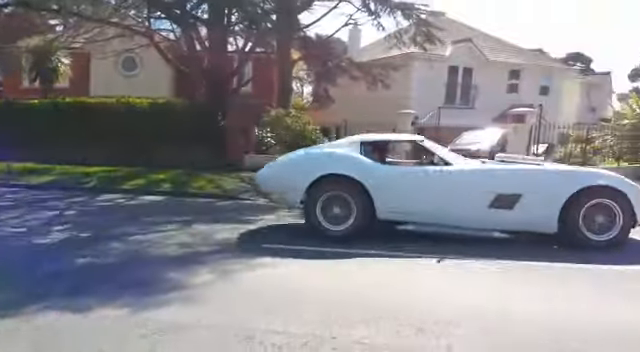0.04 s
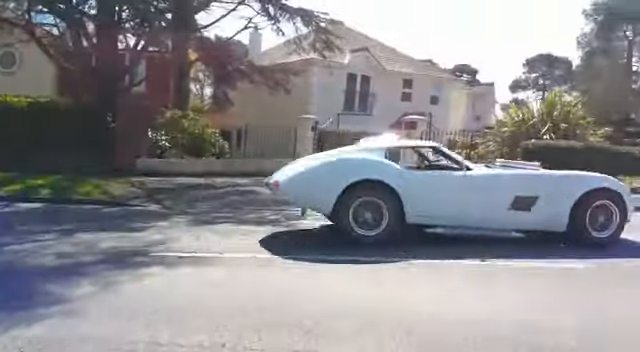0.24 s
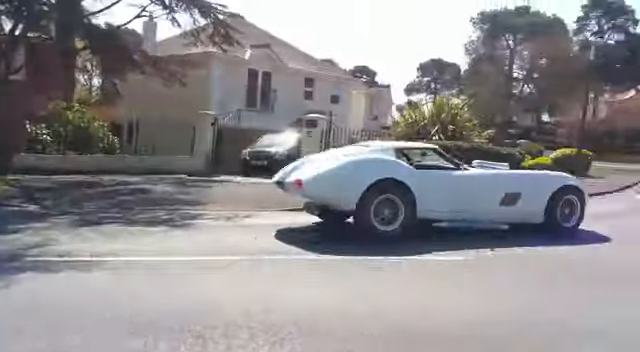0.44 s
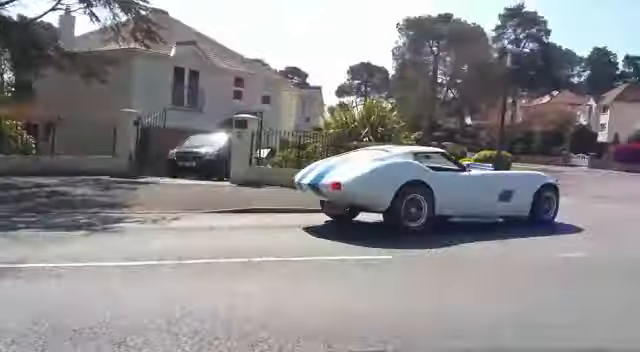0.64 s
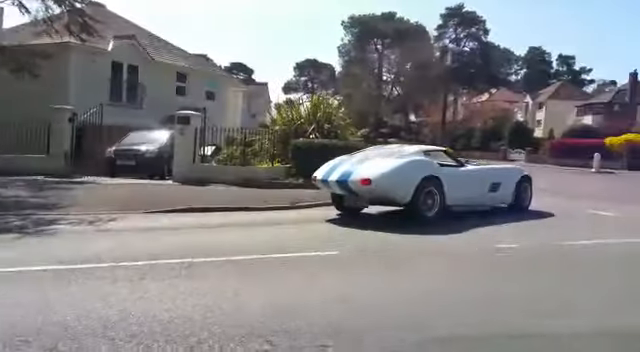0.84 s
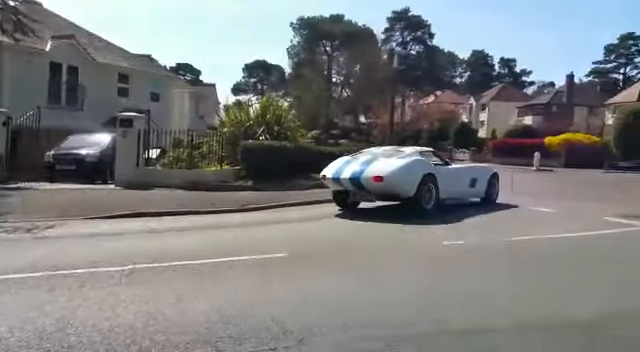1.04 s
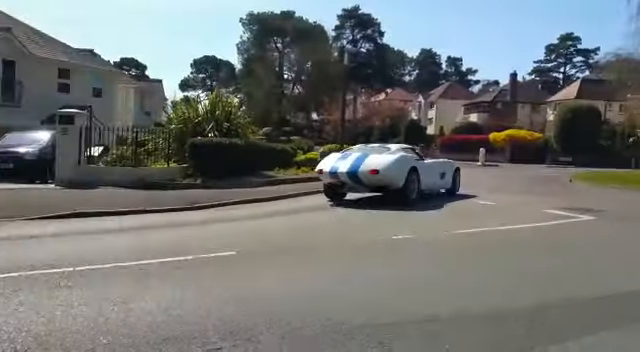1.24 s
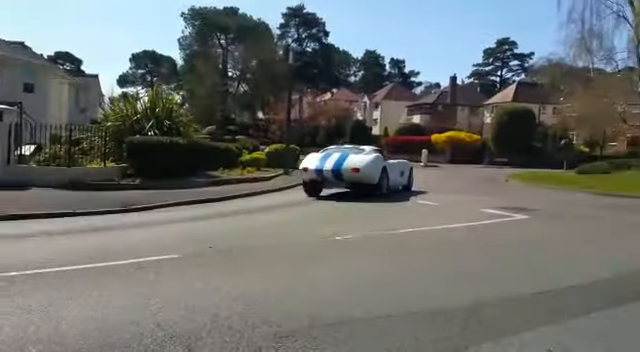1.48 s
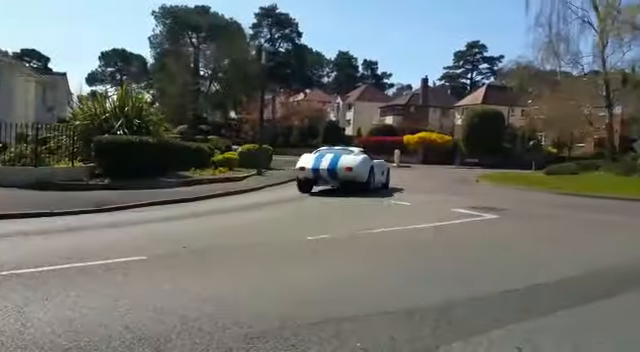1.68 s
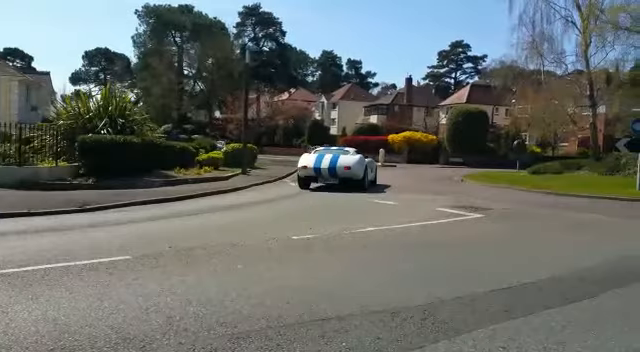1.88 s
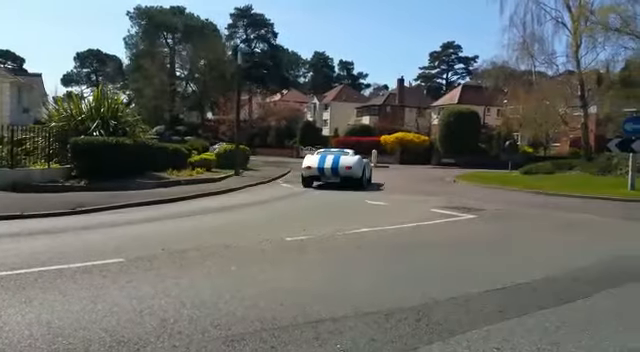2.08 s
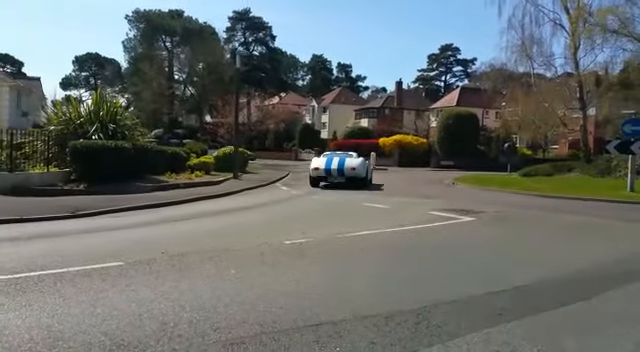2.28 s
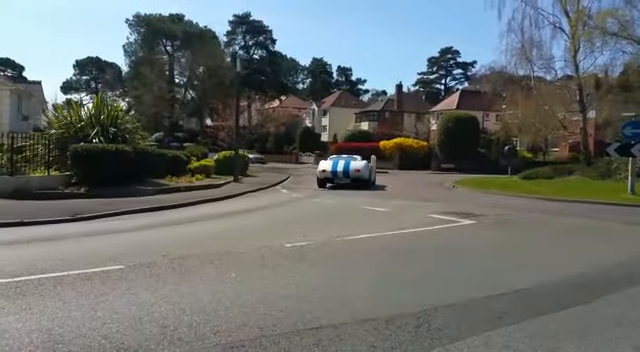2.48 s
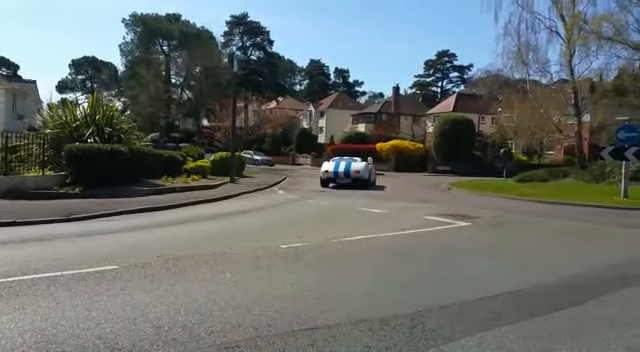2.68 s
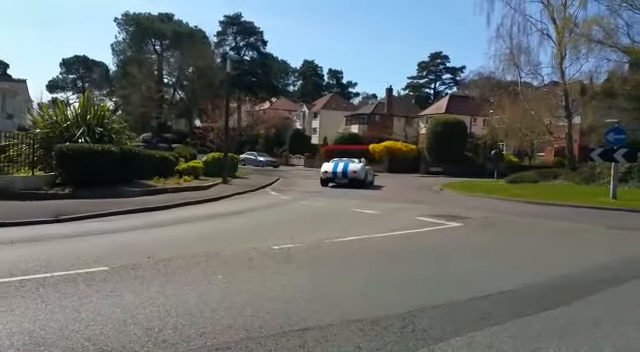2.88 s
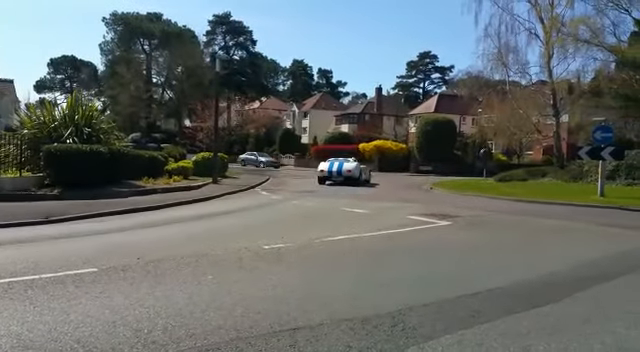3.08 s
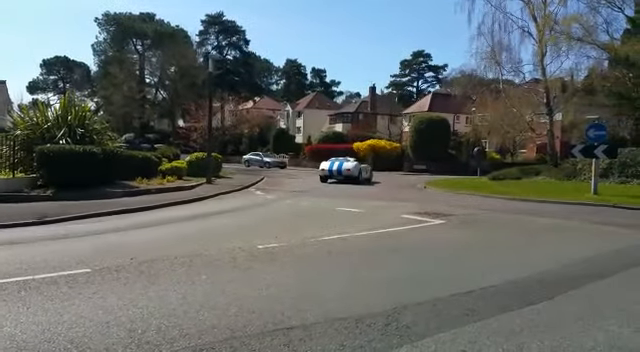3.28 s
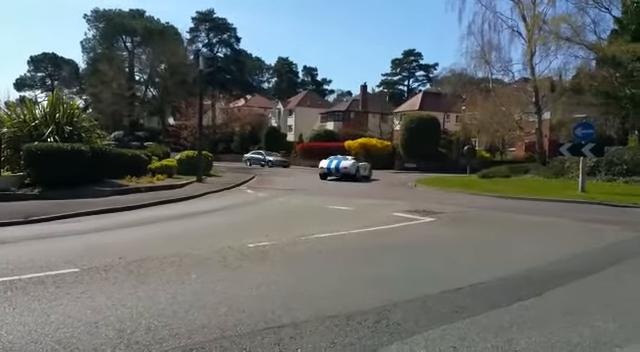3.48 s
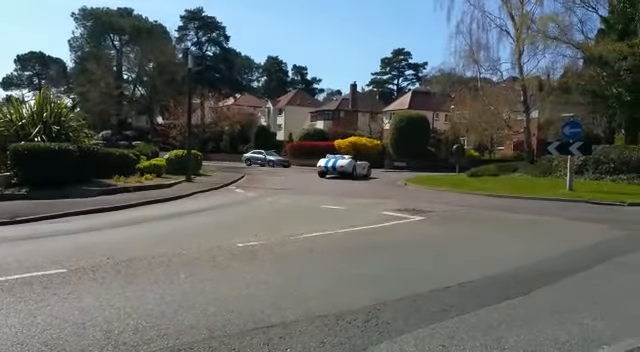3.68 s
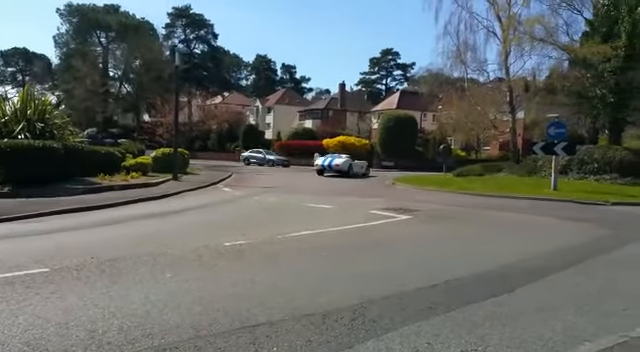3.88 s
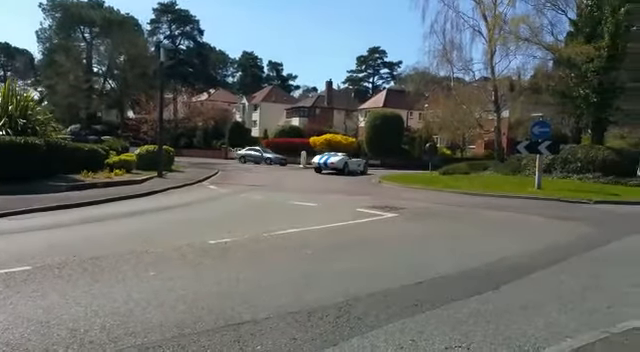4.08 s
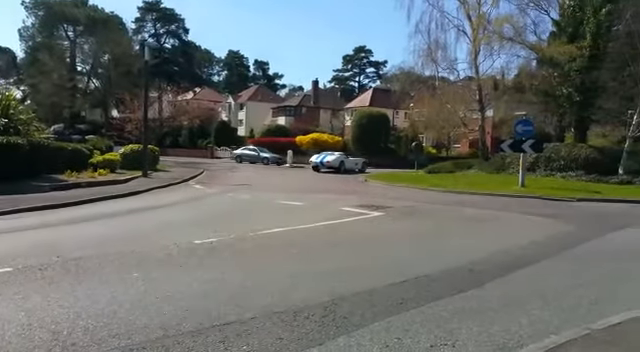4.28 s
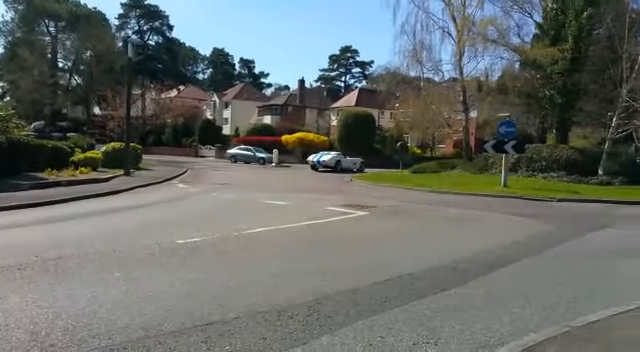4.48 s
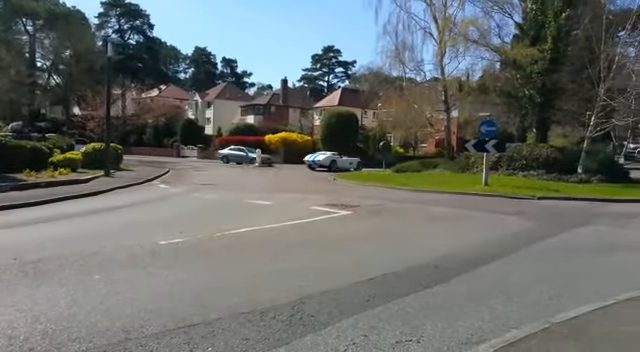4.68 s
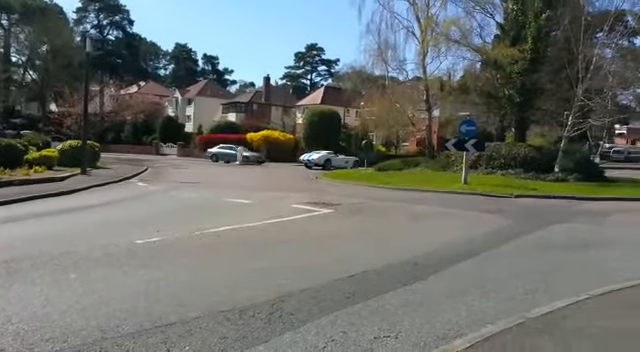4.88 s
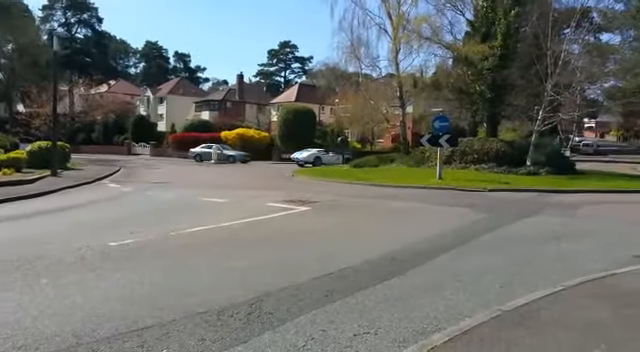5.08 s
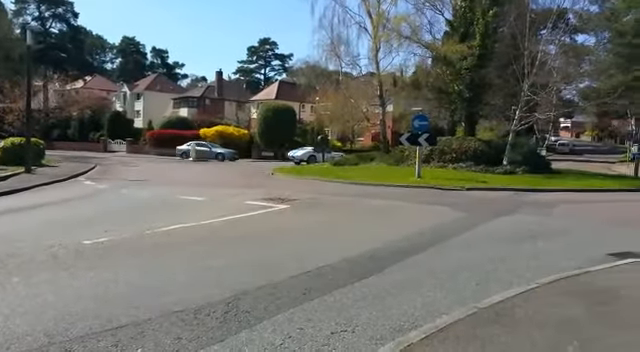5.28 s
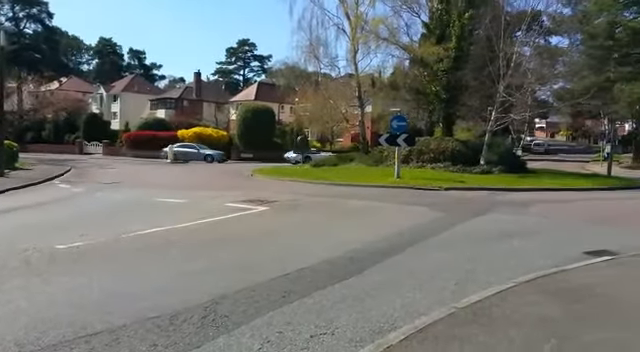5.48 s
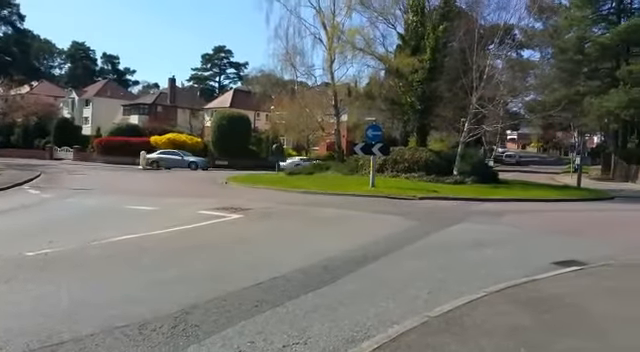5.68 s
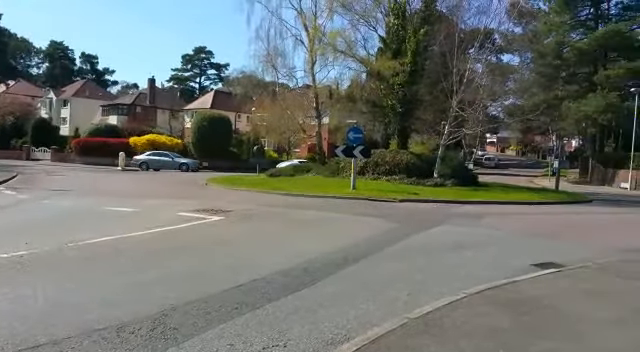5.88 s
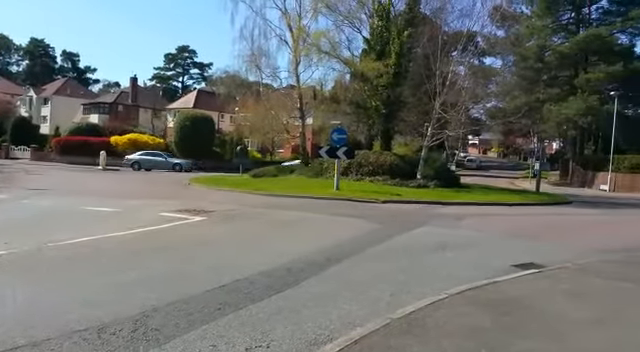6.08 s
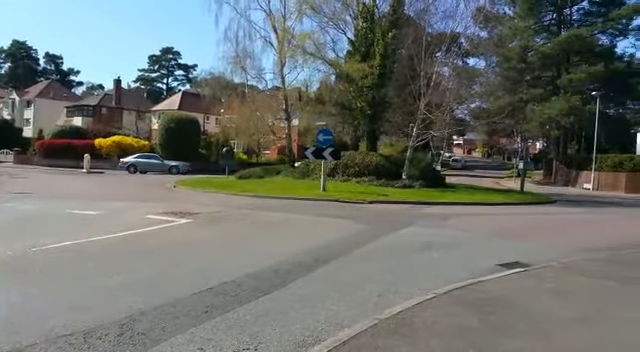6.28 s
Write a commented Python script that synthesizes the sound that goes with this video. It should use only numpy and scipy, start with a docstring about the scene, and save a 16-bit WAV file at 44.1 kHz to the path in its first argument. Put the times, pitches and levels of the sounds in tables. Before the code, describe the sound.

A coupe burbles past at low revs with a deep, uneven throb, pulls away, lifts off, then rumbles faintly as another car rolls in.

```python
"""V8 coupe passing on a quiet street

The coupe burbles past at low revs, pulls away, lifts off and rounds a traffic island. Its uneven firings ring
the exhaust pipes, gas rushes out in puffs, and scattered echoes answer; its tyres are shaped noise that fades
to a faint background hiss. Another car rolls up from the left as shaped noise and a hum. Chirps, ticks made of
dying bursts and a thin whine sit close to the two-port microphone."""
import sys
import numpy as np
from scipy import signal
from scipy.fft import rfft, irfft
from scipy.io import wavfile
from scipy.ndimage import uniform_filter1d

SR = 44100
rng = np.random.default_rng(int(sys.argv[2]) if len(sys.argv) > 2 else 0)


def bounce(signal):
    """Save signal as a 16-bit WAV file at the path given by the first command-line argument."""
    frames = np.transpose(np.atleast_2d(signal))
    limited = np.clip(frames, -1, 1)
    pcm = np.round(limited * 32767).astype(np.int16)
    wavfile.write(sys.argv[1], SR, pcm)


N = 279594
TIME = np.arange(N) / SR
BINS = np.fft.rfftfreq(N, 1 / SR)

# engine speed, eight firings to an engine cycle: time_s, firing_rate_hz
ENGINE_SPEED = [(0, 50.15), (.5, 47.48), (.87, 56.04), (1.31, 73.8), (1.69, 74.5), (2.15, 78.34),
                (2.6, 77.47), (2.99, 63.03), (3.54, 62.29), (3.82, 67.37), (3.94, 65.93), (4.43, 71.64),
                (4.79, 78.74), (5.19, 77.91), (5.64, 81.65), (5.76, 85.22), (6.34, 83.65)]


def amp(db):
    """Level law: decibels to amplitude ratio."""
    return 10 ** (np.asarray(db) / 20)


def evened(x):
    """Normalisation to unit rms."""
    return x / np.sqrt(np.mean(x ** 2) + 1e-20)


def follow(rows, t=TIME):
    """Linear interpolation of each column of a curve at times t."""
    s, *columns = np.transpose(rows)
    return [np.interp(t, s, column) for column in columns]


def read(points, hz):
    """Interpolation of a spectrum on a log-frequency axis."""
    f, value = np.transpose(points)
    return np.interp(np.log(hz + 1), np.log(f), value)


def add(mix, s, sound):
    """Superposition: mixes a sound in at time s."""
    part = mix[..., max(round(s * SR), 0):][..., :sound.shape[-1]]
    part += sound[..., :part.shape[-1]]


def wander(rate_hz):
    """Low-passed noise: a slow random fluctuation of unit rms."""
    noise = rfft(rng.standard_normal(N))
    return evened(irfft(noise / (1 + (BINS / rate_hz) ** 4), N))


def steadied(x, size=13000):
    """Envelope normalisation: divides out the slow swell and keeps the throb."""
    power = np.mean(np.atleast_2d(x) ** 2, 0)
    power = uniform_filter1d(uniform_filter1d(power, size), size // 2)
    return x / np.sqrt(abs(power) + 1e-20)


def band(x, lo_hz, hi_hz, order=2):
    """Causal Butterworth band-pass filtering."""
    edges = [lo_hz, min(hi_hz, SR / 2 - 1)]
    return signal.sosfilt(signal.butter(order, edges, "band", fs=SR, output="sos"), x)


def ramp(x, start, length):
    """Linear transition from 0 to 1 as x goes from start to start + length."""
    return np.clip((x - start) / length, 0, 1)


def ports(middle, apart, side_db):
    """Sum and difference: left and right from a shared part and an unshared one."""
    return middle + np.array([[1], [-1]]) * amp(side_db) * apart


def street(x, t60=.7, first_s=.03):
    """Multiple reflection: sparse scattered echoes under an exponential decay."""
    t = TIME[:SR]
    sparse = rng.random(SR) < .02
    taps = rng.standard_normal(SR) * sparse * (t > first_s) * amp(-60 * t / t60)
    return steadied(signal.fftconvolve(x, taps)[:N])


def tone(rows, waver_hz, waver_db):
    """Phase integration: a spectral line that wavers in pitch and level."""
    hz, db = follow(rows)
    level = np.sqrt(2) * amp(db + waver_db * wander(6.4))
    turns = np.cumsum(hz + waver_hz * wander(17.0)) / SR
    return level * np.sin(2 * np.pi * turns)


def tyres(roll, colour, sides, alike, lead, patchy_db, flicker_db, low_hz=90):
    """Tread noise on coarse asphalt: filtered noise with port level difference, coherence and delay."""
    hz, t, (a, b) = signal.stft(rng.standard_normal((2, N)), SR, nperseg=512, noverlap=384)
    hz = hz[:, None]
    level_db, tilt_db = (np.interp(t, TIME, curve) for curve in roll)
    # irregularity over time and frequency, and over time alone
    patches = uniform_filter1d(rng.standard_normal(a.shape), size=7, axis=0)
    patches = evened(uniform_filter1d(patches, size=16, axis=1))
    flicker = evened(uniform_filter1d(rng.standard_normal(len(t)), size=4))
    treble = np.log2(np.maximum(hz / 2000, 1))  # octaves above 2 kHz
    field_db = read(colour, hz) + level_db + tilt_db * treble
    field_db = field_db + patchy_db * patches + flicker_db * flicker

    same = np.clip(read(alike, hz), 0, 1)
    ratio = amp(read(sides, hz))
    late = np.exp(-2j * np.pi * hz * follow(lead, t)[0] / 1000)  # the delay as a phase shift
    right = same * a * late + np.sqrt(1 - same ** 2) * b
    pair = np.array([ratio * a, right]) / np.sqrt(1 + ratio ** 2)
    pair = pair * amp(field_db) * hz ** 2 / (hz ** 2 + low_hz ** 2)
    return np.sqrt(SR) * signal.istft(pair, SR, nperseg=512, noverlap=384)[1][:, :N]


def other_roll(near_db=-62.0, traffic_db=-72.0, tilt_db=-4.0, tilt_near_db=5.0, bright_s=6.06, bright_width_s=.8):
    """Inverse-distance law: level and treble tilt of tyres that swell out of far traffic and brighten."""
    nearest_s, pass_s = 5.5, 0.99
    near = amp(near_db) / np.hypot(1, (TIME - nearest_s) / pass_s)
    side_on = np.exp(-((TIME - bright_s) / bright_width_s) ** 2)
    level_db = 20 * np.log10(np.hypot(near, amp(traffic_db)))
    return level_db, tilt_db + tilt_near_db * side_on


def other_tyres():
    """Broadband rolling noise of the other car, reaching the left port first."""
    # spectrum before level and tilt: frequency_hz, level_db
    colour = [(400.0, -1), (600.0, -1.5), (1000.0, -1.1), (1400.0, -4), (2000.0, -1.5), (2400.0, -10.5),
              (3100.0, -21.5), (4100.0, -15), (4800.0, -23.5), (6700.0, -30.5), (7600.0, -46.5),
              (8800.0, -36.5), (9700, -43), (10500, -39), (11500.0, -47), (15500.0, -51)]
    # port level difference: frequency_hz, left_minus_right_db
    sides = [(500, -1), (1000, 1.5), (1700, -4.5), (2500, 0), (3200, 1), (5000, 1), (6100, -7), (7600, 2),
             (10500, -4), (15000, -6)]
    # port coherence: frequency_hz, likeness (0-1)
    alike = [(200, 0.98), (1000, 0.72), (4000, 0.4), (5500, 0.28), (9000, 0.53), (13000, .1)]
    # arrival difference: time_s, left_lead_ms
    lead = [(0, 0.5), (4, 0.37), (5.3, .41), (6.34, 0.44)]
    return tyres(other_roll(), colour, sides, alike, lead, patchy_db=0.92, flicker_db=0.1)


def other_hum():
    """Periodic radiation: one wavering line from the other car's engine."""
    # hum before its waver: time_s, pitch_hz, level_db
    hum_curve = [(0, 276, -76.5), (4.9, 271.2, -58), (5.4, 273.8, -39.5), (6.34, 273.2, -41.5)]
    return tone(hum_curve, waver_hz=2.7, waver_db=1.0)


def whine():
    """Narrow-band tone: a thin, high, wavering line close to the microphone."""
    # whine before its waver: time_s, pitch_hz, level_db
    whine_curve = [(0, 13900, -82), (2.5, 14100, -84), (6.34, 14300, -78)]
    return tone(whine_curve, waver_hz=15, waver_db=3.0)


def ticks(gain_db=-5, lo_hz=4500, hi_hz=13000):
    """Impulsive excitation: small dry ticks, each an exponentially dying bright burst."""
    # bursts before gain and band-pass: start_s, level_db, decay_t60_s
    tick_rows = [(1.1739, -34, 0.042), (3.7704, -31, 0.0074), (4.611, -41.5, 0.036), (4.715, -42, .01),
                 (4.717, -38.5, 0.12), (5.614, -34.5, 0.018)]
    out, t = np.zeros((2, N)), TIME[:SR // 6]
    for s, db, t60 in tick_rows:
        burst = rng.standard_normal((2, len(t))) * amp(db + gain_db - 60 * t / t60)
        add(out, s, band(burst, lo_hz, hi_hz, order=1))
    return out


def squeaks(waver_hz=60):
    """Frequency modulation: tiny high wavering chirps while the coupe is close."""
    # chirps before their waver and port gains: start_s, pitch_hz, peak_db, length_s
    squeak_rows = [(.003, 13180, -48, 0.024), (.112, 9720, -59, .022), (0.332, 6050, -51, 0.019)]
    out = np.zeros(N)
    for s, hz, db, length in squeak_rows:
        count = int(length * SR)
        turns = np.cumsum(hz + waver_hz * wander(150)[:count]) / SR
        add(out, s, amp(db) * signal.windows.tukey(count, .5) * np.sin(2 * np.pi * turns))
    return out * amp([[-6], [3]])  # left, right


def hiss(lo_hz=3950, hi_hz=4650):
    """Band-limited noise: a thin hiss that swells and fades as the coupe pulls away."""
    peak_s, width_s, level_db = 1.5, 0.7, -52.5  # level before the port gains
    air = evened(band(rng.standard_normal((2, N)), lo_hz, hi_hz))
    swell = np.exp(-((TIME - peak_s) / width_s) ** 2)
    return air * amp(level_db) * swell * amp([[2.5], [-3]])


def far():
    """Geometry of a straight steady pass: doublings of the coupe's distance since it passed."""
    nearest_m, pace_m_per_s = 4.95, 6.3
    return np.log2(np.hypot(nearest_m, pace_m_per_s * TIME) / nearest_m)


def coupe_roll(near_db=-56.5, doubling_db=-1.37, turn_db=-10.5,
               tilt_db=-0.17, tilt_doubling_db=-2.0, tilt_turn_db=7.0):
    """Distance loss: level and treble tilt (dB per octave) of the rolling noise, duller afar."""
    # in the turn the level drops and the tilt rises, leaving a faint background hiss
    turn_s, turn_lasts_s = 4.06, 2.8  # middle and length of the turn
    turned = ramp(TIME, turn_s - turn_lasts_s / 2, turn_lasts_s)
    level_db = near_db + doubling_db * far() + turn_db * turned
    return level_db, tilt_db + tilt_doubling_db * far() + tilt_turn_db * turned


def coupe_tyres():
    """Broadband rolling noise of the coupe, reaching the right port first, then a faint background hiss."""
    # spectrum before level and tilt: frequency_hz, level_db
    colour = [(450.0, -6), (740.0, -3), (950.0, -6), (1250.0, -4.5), (1500.0, -18), (2000.0, -10),
              (2600.0, -12.5), (3000.0, -17), (4300.0, -24), (6700.0, -30), (7500.0, -37), (9500.0, -36.8),
              (12000.0, -41), (15500.0, -41.5)]
    # port level difference: frequency_hz, left_minus_right_db
    sides = [(900, -0.2), (1350, 4.5), (1650, 1.5), (2000, -1), (2500, -15.5), (3300, -0.5), (4500, 6),
             (6100, -15), (7600, 1), (15000, -1)]
    # port coherence: frequency_hz, likeness (0-1)
    alike = [(200, 1), (750, 1), (1200, 0.58), (2500, 0.23), (6000, 0.24), (15000, .05)]
    # arrival difference: time_s, left_lead_ms
    lead = [(0, -0.19), (6.34, -0.094)]
    return tyres(coupe_roll(), colour, sides, alike, lead, patchy_db=1.05, flicker_db=0.82, low_hz=198)


def crank():
    """Phase as integrated frequency: the number of firings so far."""
    start = 4.85
    return start + np.cumsum(follow(ENGINE_SPEED)[0]) / SR


def heat():
    """Heating with engine speed: share of hot gas in the pipes, 0-1."""
    cool_hz, hot_hz = 52, 76  # firing rates at which the gas is all cool and all hot
    return ramp(follow(ENGINE_SPEED)[0], cool_hz, hot_hz - cool_hz)


def shut():
    """Throttling of the flow, 0-1: it snaps shut at lift-off before the island and is eased open again."""
    lift_s, shutting_s, reopen_s, easing_s = 2.66, 0.092, 3.55, .55
    return ramp(TIME, lift_s, shutting_s) - ramp(TIME, reopen_s, easing_s)


def tail_on():
    """Source orientation: how squarely the coupe's tail faces the microphone, 0-1."""
    facing_s, width_s = 2.27, 1
    return np.exp(-((TIME - facing_s) / width_s) ** 2)


def outflow(near_db, doubling_db, tail_db, shut_db, hidden_db):
    """Distance, directivity, throttling and screening by the island: level in dB of a tailpipe sound."""
    hidden_s, hiding_lasts_s = 4.35, .7
    hidden = ramp(TIME, hidden_s, hiding_lasts_s)
    place_db = near_db + doubling_db * far() + tail_db * tail_on()
    return place_db + shut_db * shut() + hidden_db * hidden


def firings(jitter_ms=0.04):
    """Pulse train: one push of gas a firing; three of eight cylinders stand out and make the lope."""
    # cylinders in firing order, before evening and scatter: strength_db, tailpipe_delay_ms
    cylinders = [(2.5, -7.4), (-8.4, -5.3), (-8.6, -4.2), (-.4, -7.1), (-9.4, -3.9), (-10.6, -3.9),
                 (1.8, -7.3), (-11, -3)]
    # near idle a strong cylinder sometimes fires feebly: time_s, change_db
    feeble = [(.061, -4), (.183, -25.5), (.287, -12), (.515, -8)]
    evening = 0.27  # share of the cylinders' difference lost when the engine runs fast
    scatter_open_db, scatter_shut_db = .9, 1.0  # the second adds on: combustion is ragged when shut

    turns = np.floor(crank()).astype(int)
    at = np.flatnonzero(np.diff(turns)) + 1
    db, delay_ms = np.array(cylinders)[turns[at] % len(cylinders)].T
    db = db * (1 - evening * heat()[at])
    for s, loss_db in feeble:
        db = db + loss_db * (abs(at / SR - s) < .012)
    size, slip = rng.standard_normal((len(at), 2)).T
    scatter_db = scatter_open_db + scatter_shut_db * shut()[at]
    place = at + (delay_ms + jitter_ms * slip) * SR / 1000
    pushes = np.zeros(N)
    strength = amp(db + scatter_db * np.clip(size, -2, 1))
    np.add.at(pushes, np.clip(place.astype(int), 0, N - 1), strength)
    return pushes


def gas(pushes, side_db=-12, rasp_lo_hz=600, rasp_hi_hz=860):
    """Turbulent jet noise: gas leaves in a puff with each push, which also has a hard edge."""
    # colour of the gas rush before scaling: frequency_hz, level_db
    rush_colour = [(20, -32), (30, -12), (42, -2), (70, 8), (170, 9), (250, -0.5), (335, -0.5),
                   (400, -13.5), (470, -19), (900, -32), (3000, -62)]
    # throaty rasp: loudest as the side pipe faces the microphone
    rasp_s, rasp_db, rasp_fade_db_per_s = 0.097, -30.5, 28

    rush = irfft(rfft(rng.standard_normal((2, N))) * amp(read(rush_colour, BINS)), N)
    rush = rush / np.std(band(rush, 230, 420))
    edge = steadied(band(pushes, 185, 290, order=3))
    edge = steadied(edge + street(edge, t60=0.49, first_s=.006))  # the road and kerbs scatter it
    rasp = evened(band(rng.standard_normal(N), rasp_lo_hz, rasp_hi_hz))
    rasp = rasp * amp(rasp_db - rasp_fade_db_per_s * abs(TIME - rasp_s))
    puffs = evened(signal.fftconvolve(pushes, np.hanning(500))[:N])
    gate = evened(1 + .3 * puffs)
    flow_db = outflow(near_db=-39.5, doubling_db=-0.46, tail_db=5.0, shut_db=-1.5, hidden_db=0.0)
    edge_db = outflow(near_db=-38.0, doubling_db=-2.0, tail_db=2.5, shut_db=2.5, hidden_db=0.5)
    return gate * (ports(*rush, side_db) * amp(flow_db) + rasp) + edge * amp(edge_db)


def boom(waver_db=0.0, lag_turns=0.13, bank_db=-40, thin_hz=56):
    """Harmonic synthesis: a deep note at the firing rate, thin near idle; uneven banks add five beats a cycle."""
    turns, speed = crank(), follow(ENGINE_SPEED)[0]
    carried = 1 / np.sqrt(1 + (thin_hz / speed) ** 16)
    level_db = outflow(near_db=-19.5, doubling_db=-3.5, tail_db=4.0, shut_db=-7.0, hidden_db=-3.5)
    level = carried * amp(level_db + waver_db * wander(4.7))
    bank_level = amp(bank_db) * (speed / 78) ** 8
    banks = bank_level * np.cos(2 * np.pi * turns * 5 / 8)
    return np.sqrt(2) * (level * np.cos(2 * np.pi * (turns - lag_turns)) + banks)


def burble(pushes, echo_side_db=-15):
    """Pipe resonance: pushes ring modes, higher and longer with hot gas; echoes gain on them with distance."""
    # lower mode with cool gas, lower mode with hot gas, upper mode: resonance_hz, width_hz
    pipe_modes = [(100, 25), (118, 17.6), (177, 16)]
    # how hard the engine pulls: time_s, load (0-1)
    load_curve = [(0, .45), (.3, 0.36), (.6, 0.49), (1.4, 1), (2, 0.23), (2.6, 0.35), (3, 0), (3.6, 0.19),
                  (4.3, 0.66), (4.7, 0.75), (5.15, 0.42), (5.5, 0.87), (6.34, 0.77)]
    near_db, full_load_db, doubling_db = -19, 10, -4.5  # overall level
    upper_load_db = -13  # full load weakens the upper mode against the lower
    echo_db, echo_doubling_db = -16, 1.5  # echo against the direct burble

    t = TIME[:SR // 4]
    load = follow(load_curve)[0]
    level_db = near_db + full_load_db * load + doubling_db * far()
    upper_db = outflow(near_db=.5, doubling_db=-2.0, tail_db=6.5, shut_db=1.5, hidden_db=-4.5)
    upper_db = upper_db + upper_load_db * load
    rings = [width * np.exp(-np.pi * width * t) * np.cos(2 * np.pi * hz * t) for hz, width in pipe_modes]
    cool, hot, upper = (signal.fftconvolve(pushes, ring)[:N] for ring in rings)
    lower = (1 - heat()) * cool + heat() * hot
    pipe = amp(upper_db) * upper - lower  # neighbouring pipe modes swing in opposite senses
    direct = steadied(band(pipe, 45, 225))
    # walls and hedges send it back
    echo = ports(street(direct, t60=0.16), street(direct, t60=.4), echo_side_db)
    echo_gain = amp(echo_db + echo_doubling_db * far())
    return steadied(direct + echo_gain * echo) * amp(level_db)


def scene():
    """Superposition of the other car, the small sounds near the microphone and the coupe."""
    other = other_tyres() + other_hum()
    small = whine() + ticks() + squeaks()
    coupe = hiss() + coupe_tyres()
    pushes = firings()
    exhaust = gas(pushes) + boom() + burble(pushes)
    return other + small + coupe + exhaust * amp([[.35], [-.35]])


def record(dry, ceiling=.6):
    """Soft saturation rounds off the loudest thumps; a low-pass then limits the band."""
    edge_hz = 15750
    rounded = dry / (1 + (dry / ceiling) ** 8) ** (1 / 8)
    lowpass = signal.firwin(1023, edge_hz, window=("kaiser", 9), fs=SR)
    return signal.oaconvolve(rounded, lowpass[None], "same")


dry = scene()
out = record(dry)
bounce(out)
```